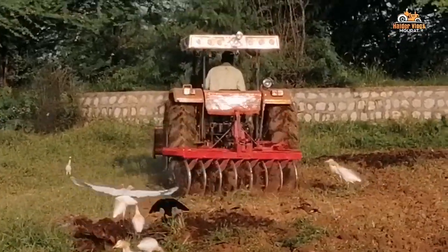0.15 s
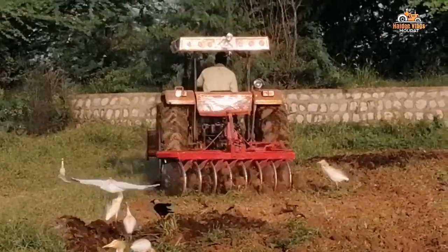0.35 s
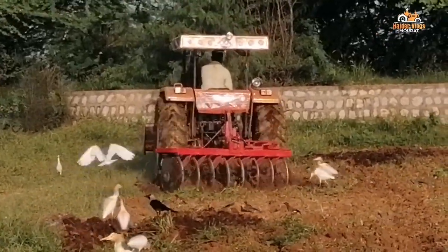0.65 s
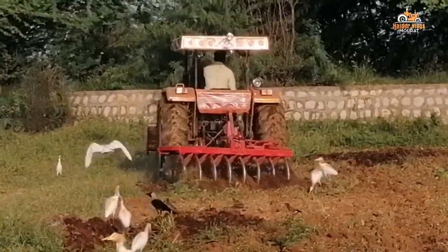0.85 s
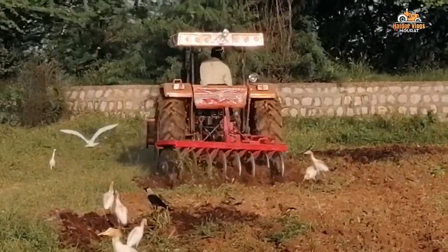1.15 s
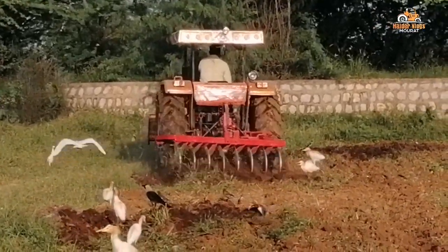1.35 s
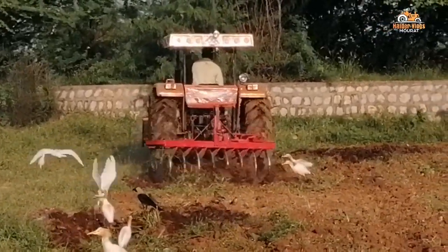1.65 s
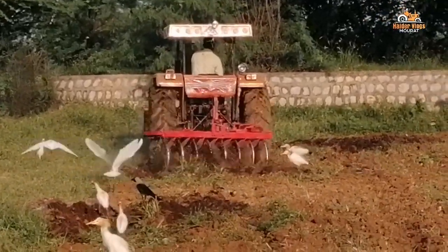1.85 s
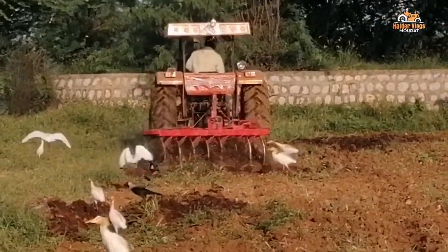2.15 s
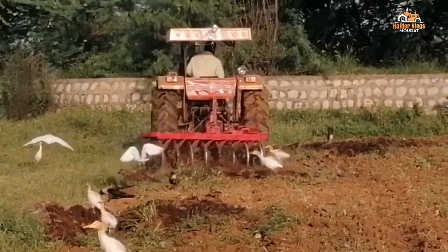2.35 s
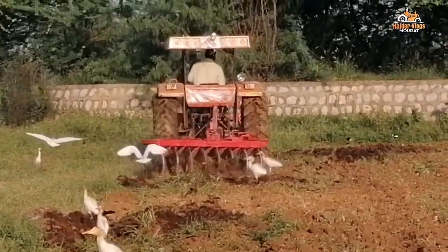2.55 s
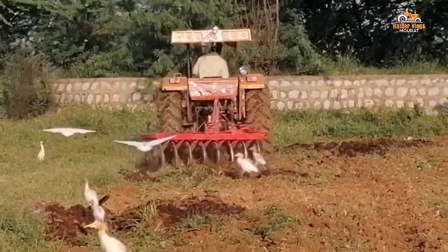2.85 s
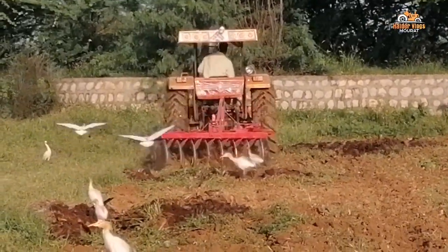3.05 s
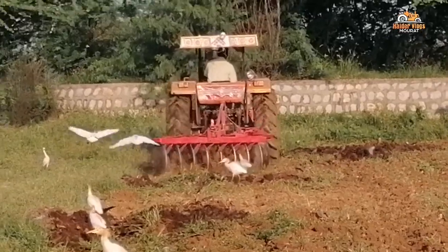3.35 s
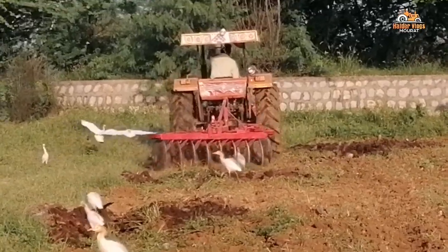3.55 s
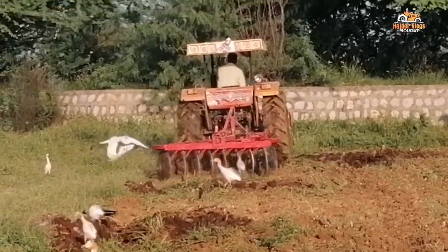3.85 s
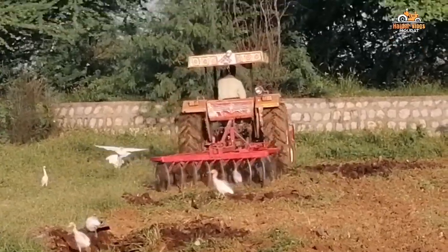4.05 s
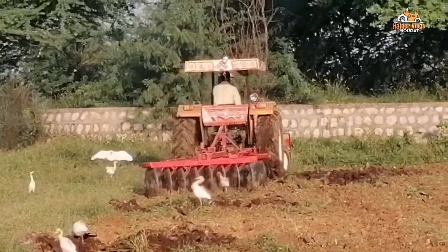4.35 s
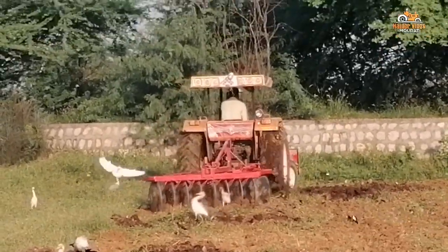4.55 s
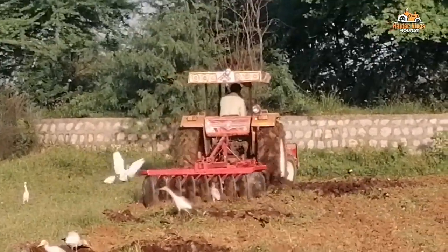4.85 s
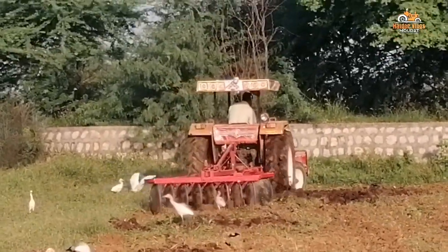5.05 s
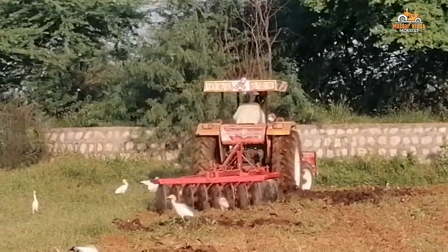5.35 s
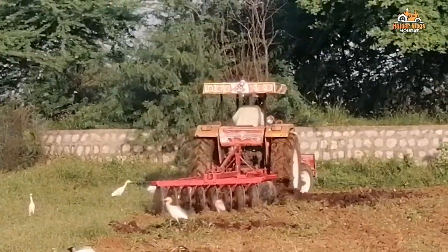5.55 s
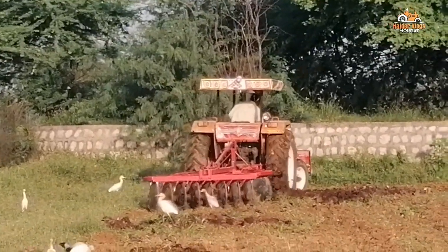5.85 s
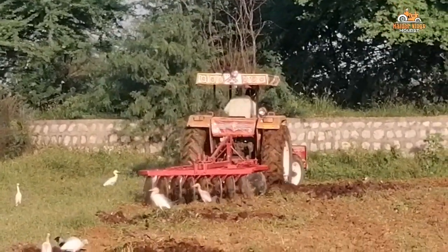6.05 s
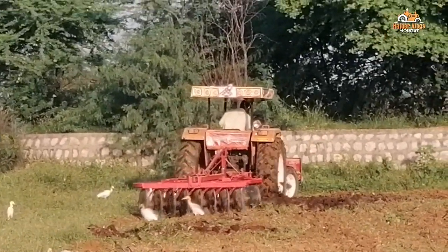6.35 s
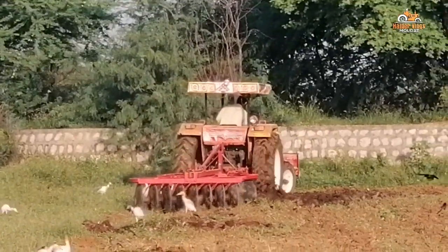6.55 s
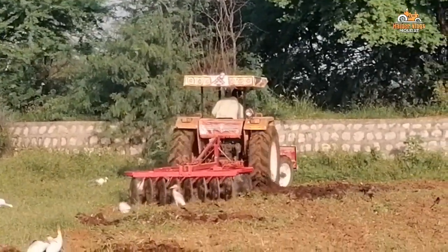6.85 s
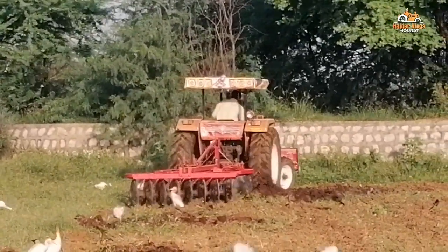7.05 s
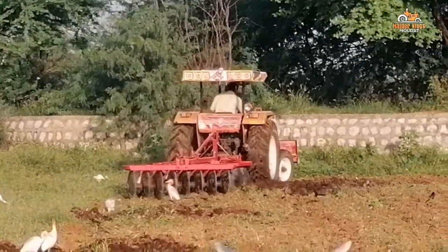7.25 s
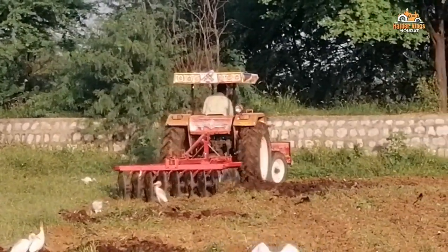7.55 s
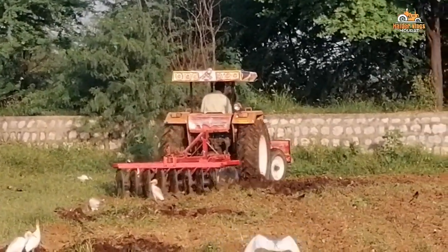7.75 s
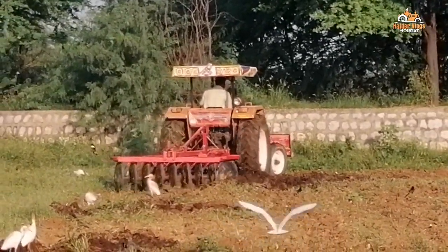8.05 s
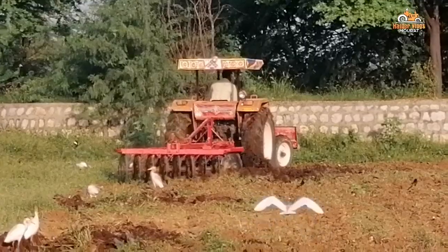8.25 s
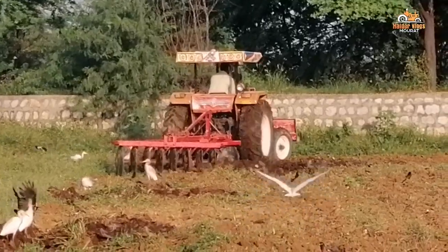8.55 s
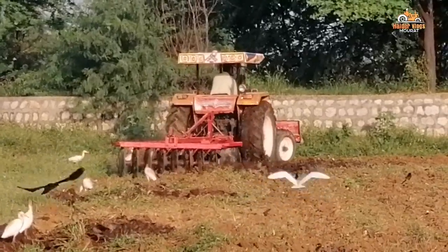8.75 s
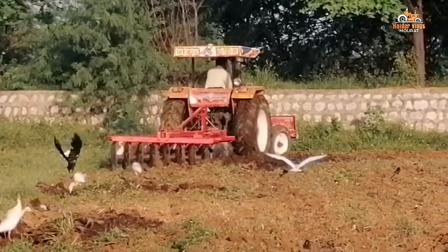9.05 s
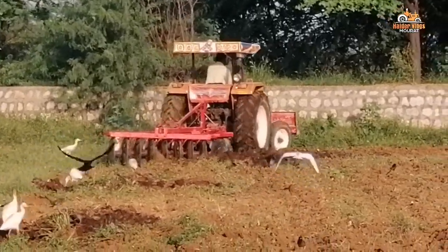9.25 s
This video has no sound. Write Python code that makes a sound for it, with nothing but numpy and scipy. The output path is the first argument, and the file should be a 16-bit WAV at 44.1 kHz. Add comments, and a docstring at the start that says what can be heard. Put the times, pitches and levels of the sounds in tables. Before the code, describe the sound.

A diesel tractor runs under load in an open field throughout, a low, steady drone with a fast throb and knock. Above it, harrow discs scrape through the soil with a softer, gritty hiss that pulses with the engine. Small birds give short whistles and chirps during the first second and a half. Faint scuffs of clods pass at around 2 seconds. At about 4.5 seconds the harrow frame makes one brief, rattling metal clank with a soft thud. Another quick run of bird chirps comes at about 6.5 seconds, and the soil hiss grows a little, with more faint scuffs. From about 7.8 seconds the engine slows and drops in pitch, settling into a slower throb from 9 seconds to the end. The sound is in stereo, with the engine's bass centred and the hiss wider.

```python
"""Tractor pulling a disc harrow

A three-cylinder diesel drones on its low firing orders; each firing rings the pipe and knocks in the
block. Discs scrape the soil, small birds chirp, clods scuff past and the frame clanks once. Near the
end the engine slows for the turn. Two microphone ports each colour the sound in their own way."""
import sys
import numpy as np
from scipy import signal
from scipy.fft import rfft, irfft
from scipy.io import wavfile
from scipy.ndimage import uniform_filter1d

SR = 44100
rng = np.random.default_rng(int(sys.argv[2]) if len(sys.argv) > 2 else 0)


def persist_wave(psi):
    """Save psi, clipped to +-1, as 16-bit WAV."""
    counts = np.round(np.clip(psi, -1, 1) * 32767).astype(np.int16)
    wavfile.write(sys.argv[1], SR, np.atleast_2d(counts).T)


N = 414528
T, HZ = np.arange(N) / SR, np.fft.rfftfreq(N, 1 / SR)


def gain_of(db):
    """Decibels to a factor."""
    return 10 ** (np.asarray(db) / 20)


def unit_rms(x):
    """Scales to rms 1."""
    return x / np.sqrt(np.mean(x ** 2) + 1e-20)


def curve(points):
    """Spreads (f/Hz, value) points over the spectrum, joined on a log-frequency axis."""
    f, value = np.transpose(points)
    return np.interp(np.log(HZ + 1), np.log(f + 1), value)


def lane(table, column=1):
    """An automation lane: one column of a timed table at every sample."""
    rows = np.array(table)
    return np.interp(T, rows[:, 0], rows[:, column])


def drift(hz):
    """A random wander of rms 1, rolling off above hz."""
    coarse_t = T[::128]
    lowpass = 1 / (1 + (np.fft.rfftfreq(4096, coarse_t[1]) / hz) ** 2)
    wander = irfft(rfft(rng.standard_normal(4096)) * lowpass)
    return unit_rms(np.interp(T, coarse_t, wander[:len(coarse_t)]))


def ring(x, hz, width_hz):
    """A mode struck by the clicks in x; its pitch may follow a curve."""
    spin = np.exp(2j * np.pi * np.cumsum(hz * np.ones(N)) / SR)
    decay = np.exp(-np.pi * width_hz / SR)
    return (spin * signal.lfilter([1], [1, -decay], x / spin)).imag


# How alike the noise is on both sides: f/Hz, likeness/0-1
STEREO_LIKENESS = [(150, 0.9), (400, 1), (700, 0.92), (1200, 0.9), (1700, 0.98), (2050, 1), (2500, 0.17),
                   (2850, 0.9), (3300, 0.07), (5900, 0.7), (7400, 0.16), (9400, 0.56), (12000, 0.14)]
def noise_pair():
    """Spectra of two noises, nearly mono in the bass and wider in the treble."""
    left_only, right = rfft(rng.standard_normal((2, N)))
    same = np.clip(curve(STEREO_LIKENESS), 0, 1)
    return np.array([same * right + np.sqrt(1 - same ** 2) * left_only, right])


# Faders riding the load: t/s, exhaust order 1/dB, low pipe/dB, block/dB, soil/dB, high pipe/dB
LOAD_FADERS = [(0, -35, -56, -39, -61.5, -50), (.35, -35.5, -58, -38.5, -59, -51),
               (1.3, -35, -57.5, -39, -57, -51), (2.4, -38, -57.5, -39.5, -59, -52),
               (3.2, -36.5, -59.5, -40, -58, -53), (3.95, -43, -57, -40.5, -58.5, -53.5),
               (4.6, -39, -57, -40, -60, -56), (5.2, -41, -60.5, -40.5, -58.5, -53.5),
               (5.95, -41, -60.5, -39.5, -59, -52), (6.3, -40, -57.5, -39, -55.5, -52),
               (7.2, -38, -59.5, -39, -55.5, -55.5), (7.67, -41, -59, -39, -54.5, -52),
               (7.88, -42, -68, -40.5, -58.5, -53), (8.01, -50, -69, -42.5, -61, -62),
               (8.15, -39, -73, -43, -62.5, -53), (8.35, -39, -82, -43, -59.5, -55),
               (8.79, -34, -69, -41.5, -55.5, -51), (9.4, -46, -61.5, -39, -56, -51.5)]
# The drone's overtones swell and fade: t/s, order 2/dB, order 3/dB, order 4/dB
DRONE_OVERTONES = [(0, -25.5, -36, -45), (.15, -27, -37.5, -49), (.4, -27.5, -29, -49),
                   (.66, -27, -37.5, -44), (1.0, -27.5, -30.5, -46), (1.3, -25, -32, -45),
                   (1.52, -26.5, -30.5, -45.5), (1.85, -28.5, -39.5, -48), (2.2, -27.5, -30.5, -45),
                   (2.5, -26, -31, -41.5), (2.88, -27, -38.5, -49), (3.11, -29, -30, -43),
                   (3.56, -28, -31, -45), (4.0, -26, -38.5, -45), (4.4, -26, -30.5, -47),
                   (4.7, -26, -32, -52), (5.1, -29, -31.5, -50), (5.55, -31, -41.5, -44.5),
                   (6.0, -31, -39.5, -49), (6.33, -29.5, -29, -45), (6.8, -28.5, -28.5, -62),
                   (7.56, -26.5, -30.5, -62), (7.88, -26, -38, -45), (8.07, -32.5, -31.5, -50),
                   (8.55, -37, -31, -51), (8.86, -37, -35, -43), (9.03, -28, -41, -40.5),
                   (9.4, -28, -41, -49)]
# Order 5 comes up as the engine slows: t/s, level/dB
FIFTH_ORDER = [(0, -61), (7.9, -63), (8.25, -52), (8.65, -54), (8.9, -64), (9.1, -53), (9.4, -52)]
# Weak tones from unequal cylinders: multiples of the three-firing cycle
CYCLE_ORDERS = [4, 5, 7, 8, 10, 11, 13, 14, 15]
# Those tones against the block fader: level/dB
CYCLE_LEVELS = [-20, -15, -11, -13, -18, -9, -18, -20, -21]
def exhaust(firings):
    """The drone: clean firing orders, phased so that each pulse dips and rebounds."""
    overtones_db = [lane(DRONE_OVERTONES, column) for column in (1, 2, 3)]
    levels_db = [lane(LOAD_FADERS, 1), *overtones_db, lane(FIFTH_ORDER)]
    wavers_db = [0.77, 0.45, 0.88, 1.3, 1.3]
    out = 0
    for order, (db, waver_db) in enumerate(zip(levels_db, wavers_db), 1):
        phase = .44 * (order - 4.16) ** 2 - 2.05
        out += gain_of(db + waver_db * drift(10)) * np.cos(2 * np.pi * order * firings + phase)
    for order, db in zip(CYCLE_ORDERS, CYCLE_LEVELS):
        level = gain_of(lane(LOAD_FADERS, 3) + db + 3 * drift(3))
        out += level * np.cos(2 * np.pi * (order * firings / 3 + rng.random()) + .5 * drift(6.7))
    return out


# Each cylinder's punch and its trip down the manifold branch: strength/dB, delay/s
CYLINDER_BLOWS = [(5, 0), (0, .0011), (-2, -.0008)]
# Pipe resonances: f/Hz, width/Hz, level against the fader/dB
PIPE_MODES = [(322.2, 33, 1), (372.4, 89, 3), (619, 60, -5.5), (684.5, 39, 0.5)]
# The high modes bend as the tractor turns: t/s, pitch ratio
PIPE_BEND = [(0, 1.01), (4, 1.0), (5.2, .98), (5.6, 1.034), (6.15, .96), (6.5, 1.0), (7.2, 1.003),
             (7.75, 0.956), (8.3, 1.0), (8.8, 1.04), (9.4, 1.03)]
def pipe(firings):
    """Each firing strikes the pipe modes; the low ones tell the cylinders apart most."""
    count = np.floor(firings + 0.051).astype(int)
    onsets = np.flatnonzero(np.diff(count)) + 1
    strength_db, delay_s = np.array(CYLINDER_BLOWS)[count[onsets] % 3].T
    chance = rng.standard_normal((len(onsets), len(PIPE_MODES), 2))
    out = 0
    for k, (hz, width_hz, db) in enumerate(PIPE_MODES):
        low = hz < 500
        jitter = 4 * chance[:, k, 0]  # ignition comes a few samples early or late
        at = np.clip(onsets + (delay_s * SR + jitter).astype(int), 0, N - 1)
        blows = np.zeros(N)
        blows[at] = gain_of((1 if low else .55) * strength_db + 1.2 * chance[:, k, 1])
        tuned_hz = hz if low else hz * lane(PIPE_BEND)
        rung = ring(ring(blows, tuned_hz, width_hz), tuned_hz, 2.5 * width_hz)
        fader_db = lane(LOAD_FADERS, 2 if low else 5)
        out += gain_of(fader_db + db) * unit_rms(np.diff(rung, prepend=0))
    return out


def firing_throb(firings, sizes):
    """A quick attack and slower release at each firing, scaled by that firing's size."""
    place = firings + 0.036
    burst = sizes[place.astype(int)] * np.sin(np.pi * (place % 1) ** 0.59) ** 3
    return unit_rms(burst - burst.mean())


# How each noise band pumps with the engine: f/Hz, depth/dB, delay/firings
THROB_BANDS = [(200, 3.5, -.08), (680, 1.6, -.1), (1100, 1.5, .16), (1550, 1.4, .2), (2200, .7, .05),
               (2850, 1.1, -.06), (4200, .7, -.08), (6200, 1.2, -.05), (10000, 1.2, 0)]
def throbbing_noise(colour, firings, grit=0):
    """Coloured noise whose bands swell with each firing, and flutter and wander on their own."""
    spectra = noise_pair() * gain_of(curve(colour))
    centres_hz = np.array(THROB_BANDS)[:, 0]
    sizes = 1 + .1 * rng.standard_normal(int(firings[-1]) + 3)
    out = 0
    for solo, (_, depth_db, delay) in zip(np.eye(len(centres_hz)), THROB_BANDS):
        band = irfft(spectra * curve(list(zip(centres_hz, solo))), N)
        throb = firing_throb(firings + 1 - delay, sizes) + grit
        out += band * gain_of(depth_db * throb + 0.98 * drift(18) + 0.62 * drift(1.24))
    return unit_rms(out)


# The knock's mid-heavy colour: f/Hz, relative level/dB
KNOCK_EQ = [(60, -16), (150, -1), (240, -11), (330, -1.5), (460, -4), (560, 0), (700, 3), (1000, 1.5),
            (1700, 1.5), (2900, -6.5), (3400, -34.5), (6000, -46), (9000, -39)]
def block(firings):
    """Combustion knock and valve clatter: noise that bursts at each firing."""
    return gain_of(lane(LOAD_FADERS, 3)) * throbbing_noise(KNOCK_EQ, firings)


# The bright hiss of soil on steel: f/Hz, relative level/dB
SCRAPE_EQ = [(1500, -26), (3000, 0.5), (3600, 8.5), (6000, 2.5), (6800, 0), (7900, -2.5), (8800, -3.5),
             (9800, -12), (11800, -44), (15000, -12)]
def discs(firings, ticks_per_s=700):
    """Soil hisses along the discs, shaken by the engine, with grit ticking against the steel."""
    tick_db = 6.4 * np.minimum(rng.exponential(1, N), 3)
    ticks = gain_of(tick_db) * (rng.random(N) < ticks_per_s / SR)
    swell = uniform_filter1d(ticks, 60)
    grit = .4 * unit_rms(swell - swell.mean())
    return gain_of(lane(LOAD_FADERS, 4)) * throbbing_noise(SCRAPE_EQ, firings, grit)


# Whistled notes: t/s, length/s, first f/Hz, last f/Hz, level/dB, trill depth/Hz, relative octave/dB
BIRD_NOTES = [(.04, .13, 2230, 2420, -49, 0, -30), (.395, .095, 2450, 2340, -50, 0, -30),
              (.422, .025, 3280, 3350, -55, 0, -20), (.455, .07, 2890, 3040, -52, 180, -22),
              (.697, .031, 6050, 5250, -57, 200, -30), (.73, .13, 2410, 2400, -50.5, 0, -30),
              (1.37, .05, 5550, 3800, -53, 80, -30), (2.325, .05, 3400, 3230, -61, 0, -30),
              (6.478, .046, 3400, 3300, -50, 380, -12), (6.527, .023, 3120, 2950, -48, 60, -10),
              (6.556, .068, 2830, 3090, -47, 90, -12), (6.615, .038, 3080, 2430, -42, 0, -26),
              (6.652, .02, 2460, 2400, -45, 0, -30)]
def birds(trill_rate_hz=48):
    """Slightly raspy gliding whistles with a breathy octave, some with a fast trill."""
    out = np.zeros(N)
    rasp = unit_rms(uniform_filter1d(rng.standard_normal(N), 80))
    breath = unit_rms(uniform_filter1d(rng.standard_normal(N), 50))
    for start, length, first_hz, last_hz, db, trill_hz, octave_db in BIRD_NOTES:
        t, at = np.arange(0, length, 1 / SR), round(start * SR)
        glide = 1 - (1 - t / length) ** 1.5  # starts fast and flattens out
        hz = first_hz + (last_hz - first_hz) * glide + trill_hz * np.sin(2 * np.pi * trill_rate_hz * t)
        phase = 2 * np.pi * np.cumsum(hz) / SR
        octave = gain_of(octave_db) * breath[at:at + len(t)] * np.sin(2 * phase)
        out[at:at + len(t)] += gain_of(db) * (np.sin(phase) + octave) * signal.windows.tukey(len(t), .35)
    out *= 1.25 + .45 * rasp
    return np.array([.7 * np.roll(out, 4), out])  # placed to the right in the dry mix


# Thuds and scuffs at the discs: t/s, length/s, f/Hz, width/Hz, level/dB
CLOD_SCUFFS = [(1.692, 0.044, 4000, 300, -60), (2.217, 0.2, 4160, 1000, -58), (2.68, .14, 4600, 600, -60),
               (4.57, 0.18, 242, 110, -44.5), (5.17, 0.11, 4770, 900, -63), (6.6, .35, 5000, 500, -62),
               (7.15, .7, 6150, 500, -64), (8.6, 0.64, 6150, 500, -69), (8.9, .25, 4900, 400, -62)]
def clods():
    """Clods and stones brush past: short swells of noise around one resonance each."""
    out, spectra = np.zeros((2, N)), noise_pair()
    for start, length, hz, width_hz, db in CLOD_SCUFFS:
        at, size = round(start * SR), round(length * SR)
        band = unit_rms(irfft(spectra / (1 + (2 * (HZ - hz) / width_hz) ** 4), N))
        out[:, at:at + size] += gain_of(db) * band[:, at:at + size] * np.hanning(size) ** .5
    return out


# The flurry of blows in one clank: t/s, level/dB, brightness/dB per octave
FRAME_BLOWS = [(4.508, -42, -10), (4.531, -49, 4.5), (4.547, -53, 7), (4.562, -52, -4), (4.58, -53, -4),
               (4.599, -42.5, 2.5), (4.612, -55, -7), (4.624, -55, -5), (4.653, -52, -4)]
# The harrow frame's metallic ring: f/Hz, relative level/dB, t60/s
FRAME_MODES = [(960, -3, 0.05), (1580, 11, 0.091), (2320, 11, 0.06), (2930, -12, 0.055), (3370, -13, 0.05),
               (3730, 1, 0.05), (5620, -3, 0.054), (6560, -22, 0.04), (8900, -12, 0.033)]
def frame_clank(rattle_t60=.12, attack_s=.0028):
    """Each blow sets off a rough rattle and rings the frame modes, slightly detuned."""
    out, t = np.zeros((2, N)), T[:SR // 3]
    rattle_eq = curve([(300, -10), (1500, 0), (3000, -3), (3600, -14), (8900, -20), (9500, -45)])
    noise = unit_rms(irfft(noise_pair() * gain_of(rattle_eq), N))
    chatter = 1 + .6 * drift(150)  # loose parts touch and damp the rings unevenly
    for start, db, tilt_db in FRAME_BLOWS:
        rung = 0
        for hz, mode_db, t60 in FRAME_MODES:
            struck_db = mode_db + tilt_db * np.log2(hz / 2000) + rng.normal(0, 3.8)
            detuned_hz = hz * rng.normal(1, .017)
            rung += gain_of(struck_db - 60 * t / t60) * np.sin(2 * np.pi * detuned_hz * t)
        at = round(start * SR)
        span = slice(at, at + len(t))
        rattle = 3 * noise[:, span] * gain_of(.5 * tilt_db - 60 * t / rattle_t60)
        out[:, span] += gain_of(db) * (rung * chatter[span] + rattle) * (1 - np.exp(-t / attack_s))
    return out


# Engine speed, sagging for the turn: t/s, firing rate/Hz
FIRING_RATE = [(0, 40.3), (.3, 39.2), (.6, 38.6), (1.1, 38.7), (1.25, 39.2), (1.8, 39.0), (3.5, 38.95),
               (3.85, 39.3), (4.45, 39.4), (4.8, 40.0), (5.1, 40.0), (5.4, 39.35), (6.0, 39.35),
               (6.3, 38.75), (7.5, 38.45), (7.8, 37.9), (8.1, 35.2), (8.4, 34.6), (8.6, 33.6), (8.95, 33.0),
               (9.4, 33.0)]
def scene():
    """The dry stereo mix; one running count of firings keeps engine and discs in step."""
    firings = np.cumsum(lane(FIRING_RATE)) / SR
    engine = exhaust(firings) + pipe(firings) + block(firings)
    harrow = discs(firings) + frame_clank() + clods()
    return engine + harrow + birds()


# The left port's colour: f/Hz, level/dB
LEFT_EQ = [(100, -6), (350, -4.5), (700, -2.5), (950, -7), (1400, -0.5), (1650, -6), (2000, 1),
           (2800, -2.5), (3200, -1), (3900, 1.5), (5400, 3.5), (5800, 2.5), (7400, -11), (9200, 0),
           (14500, -0.5)]
# How far the left port runs ahead: f/Hz, phase/rad
LEFT_PHASE = [(150, 0.065), (430, 1.14), (600, 0.32), (1300, 2.23), (1450, 0.45), (1850, 3.97), (2200, 5.6),
              (2500, 7), (2650, 5.6), (3100, 6.9), (4200, 16.73), (6000, 16.3), (9400, 28.8), (15000, 44)]
# The right port's colour: f/Hz, level/dB
RIGHT_EQ = [(100, 0.5), (450, -2), (690, 1), (950, -1.5), (1200, 4), (1400, -8), (1650, 3.5), (2000, -14.5),
            (2550, -8), (2900, 5.5), (4300, -4), (5600, 2), (5950, 5.5), (8800, 2.5), (14800, -6)]
# Small cavity resonances behind the right port: f/Hz, width/Hz, boost/dB
CAVITY_PEAKS = [(1715, 85, 4.5), (2827, 140, 2.5), (5930, 300, 5), (6730, 240, 4.5), (8650, 300, 4)]
def record(dry):
    """Each microphone port adds its own colour, the left a phase lead; then a steep high cut."""
    lead = np.interp(HZ, *np.transpose([(0, 0.0079)] + LEFT_PHASE))
    left = gain_of(curve(LEFT_EQ)) * np.exp(1j * lead)
    cavity_db = sum(db / (1 + (2 * (HZ - hz) / width_hz) ** 2) for hz, width_hz, db in CAVITY_PEAKS)
    right = gain_of(curve(RIGHT_EQ) + cavity_db)
    heard = irfft(rfft(dry) * np.array([left, right]), N)
    high_cut = signal.firwin(1023, cutoff=15150, window=("kaiser", 13), fs=SR)
    return signal.oaconvolve(heard, high_cut[None], "same")


dry = scene()
out = record(dry)
persist_wave(out)
```